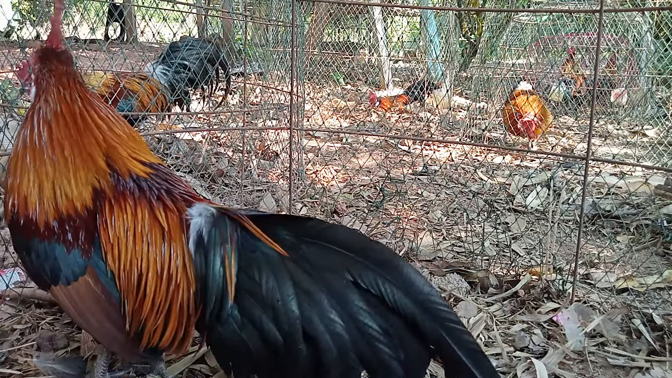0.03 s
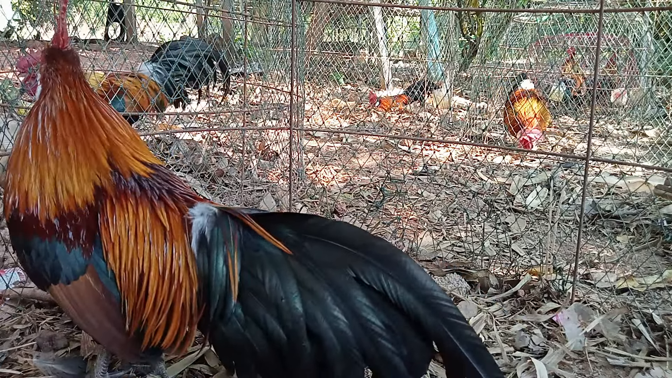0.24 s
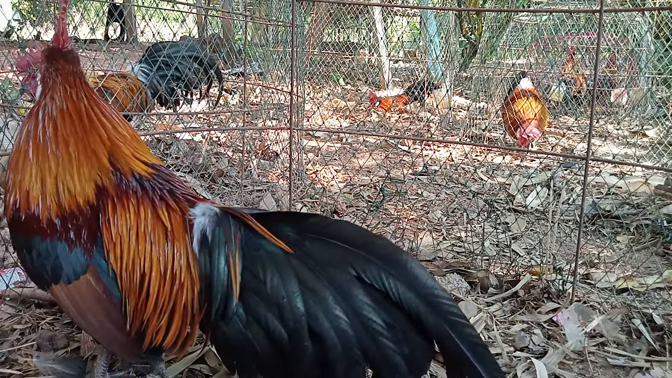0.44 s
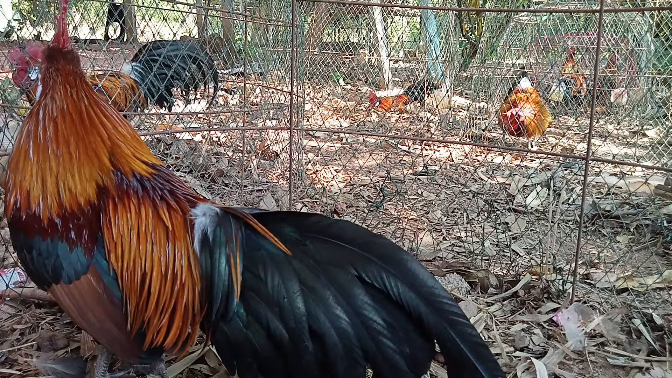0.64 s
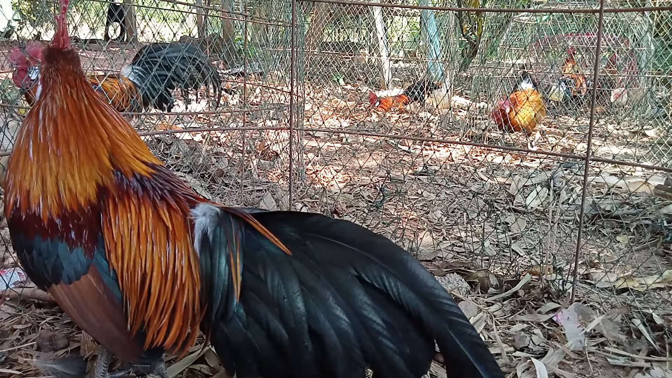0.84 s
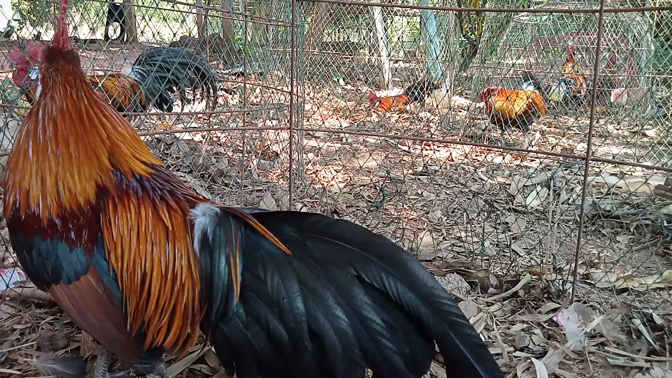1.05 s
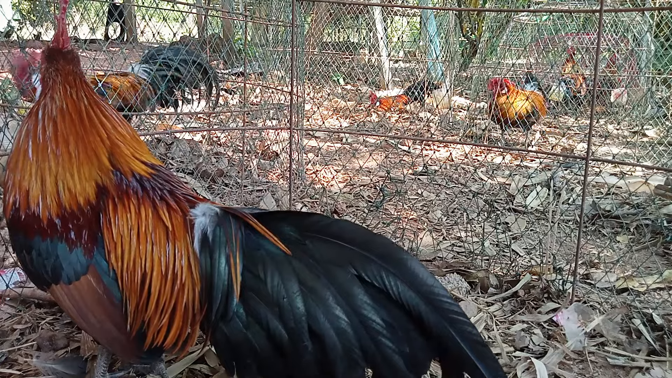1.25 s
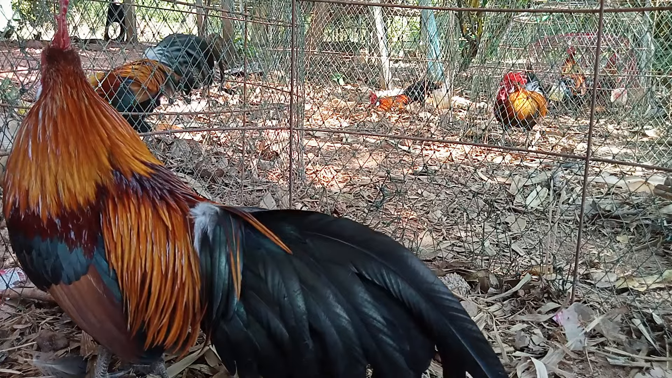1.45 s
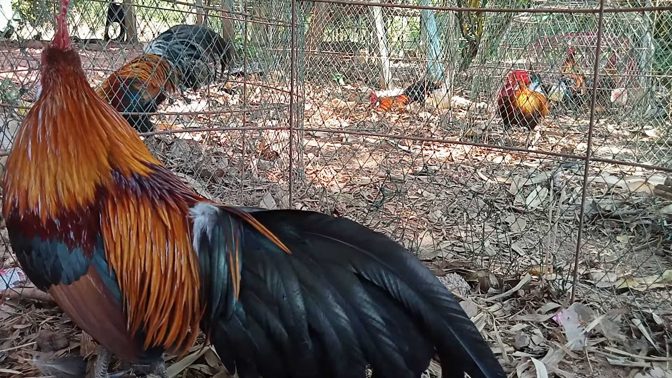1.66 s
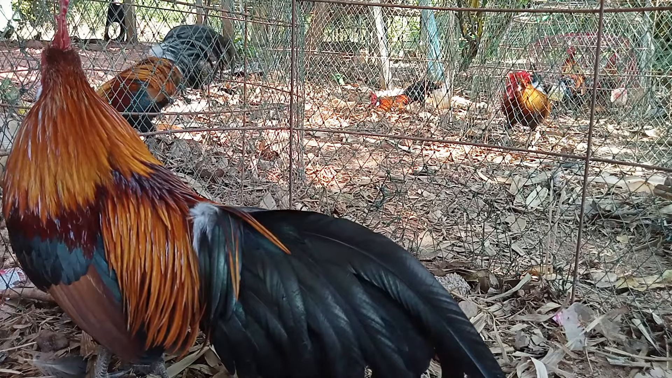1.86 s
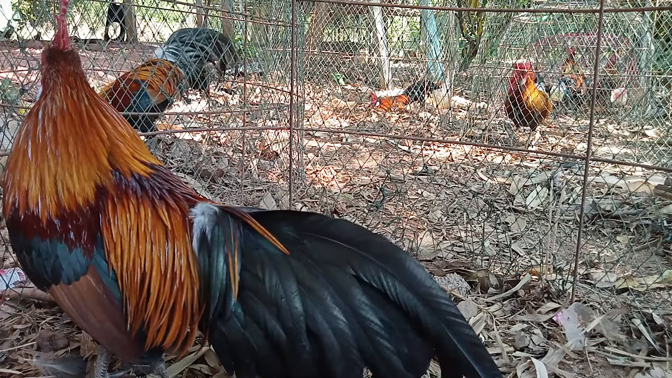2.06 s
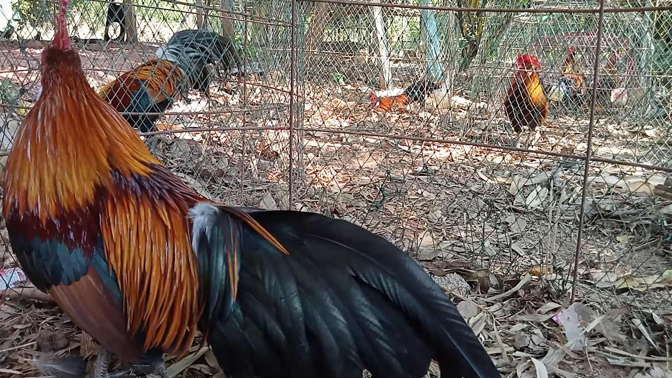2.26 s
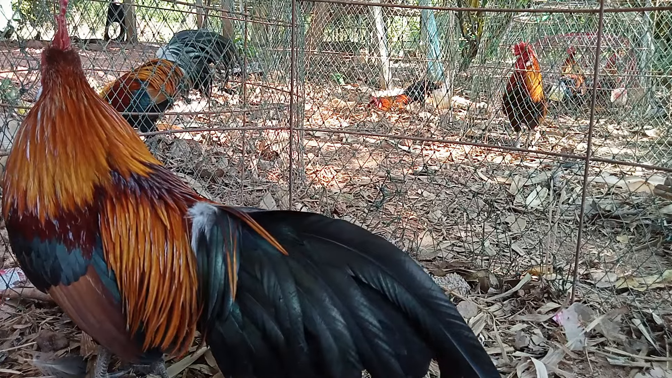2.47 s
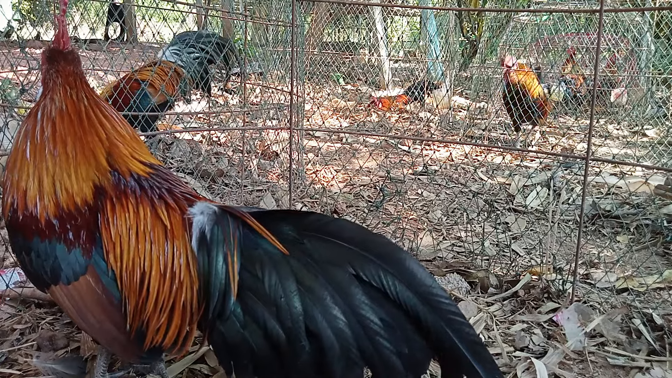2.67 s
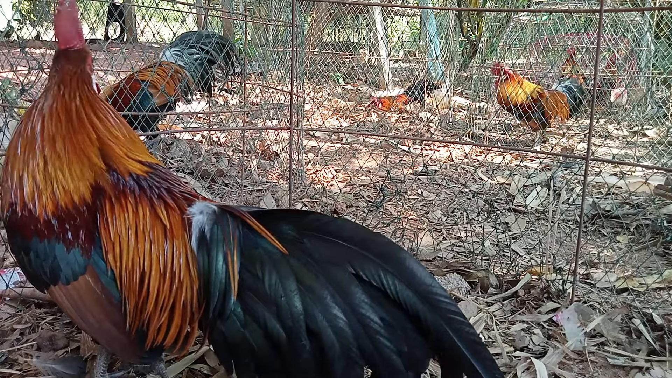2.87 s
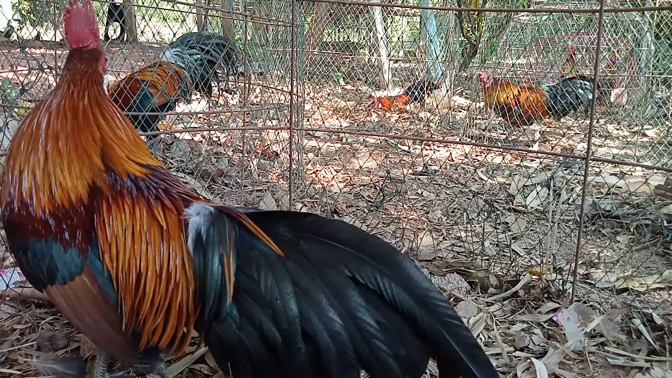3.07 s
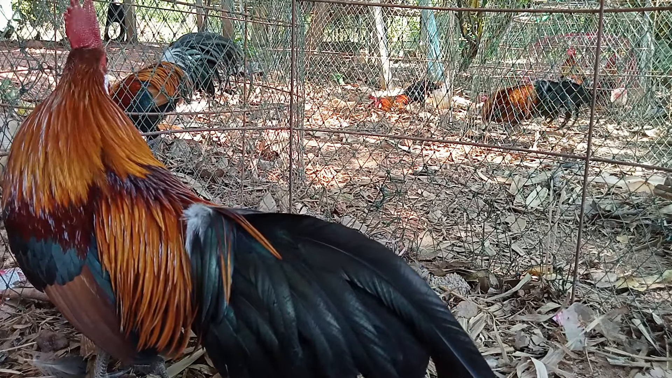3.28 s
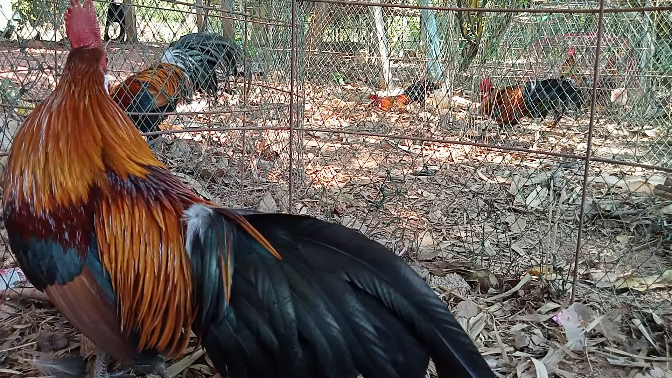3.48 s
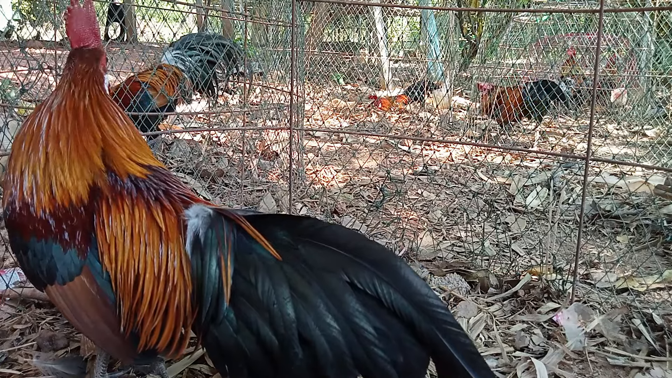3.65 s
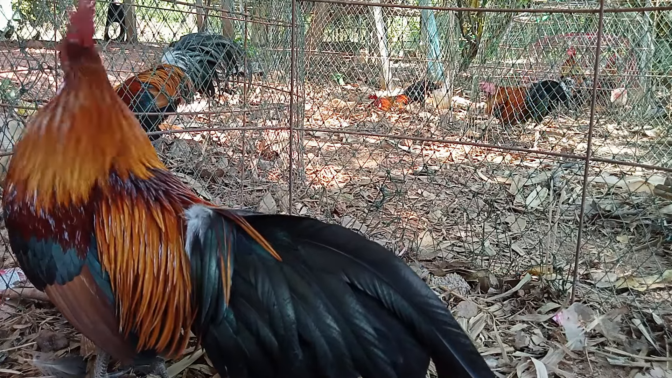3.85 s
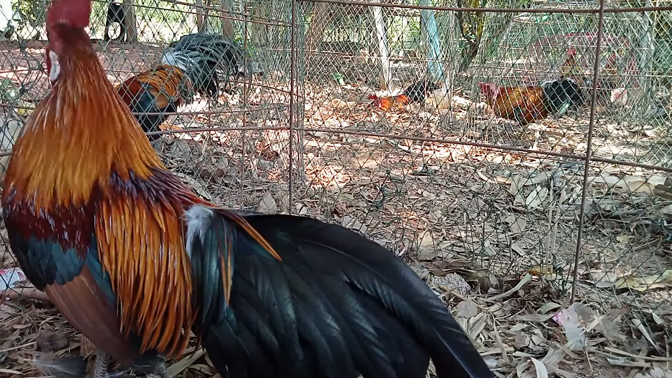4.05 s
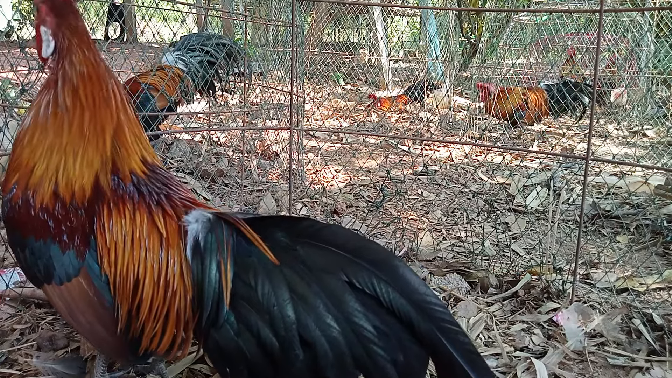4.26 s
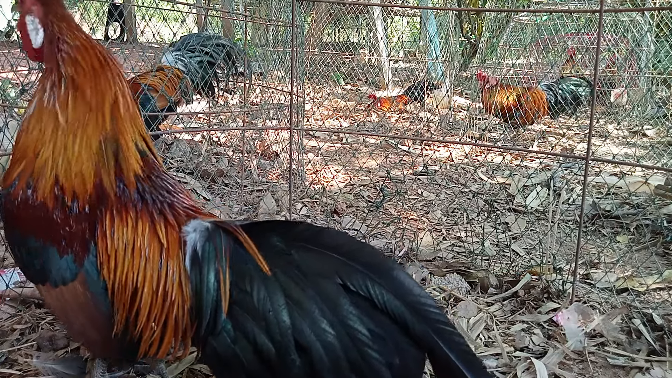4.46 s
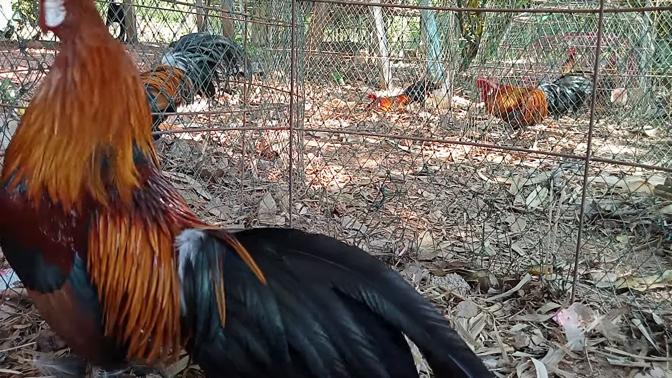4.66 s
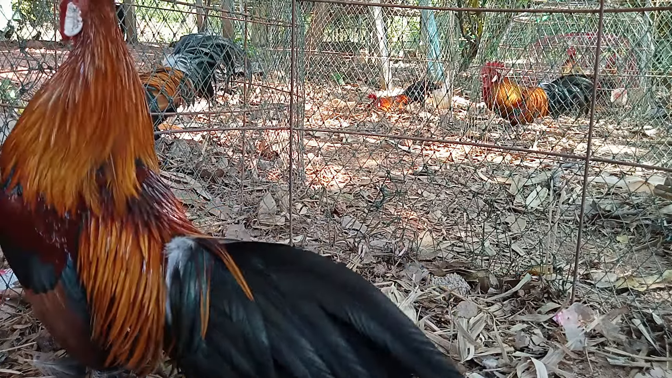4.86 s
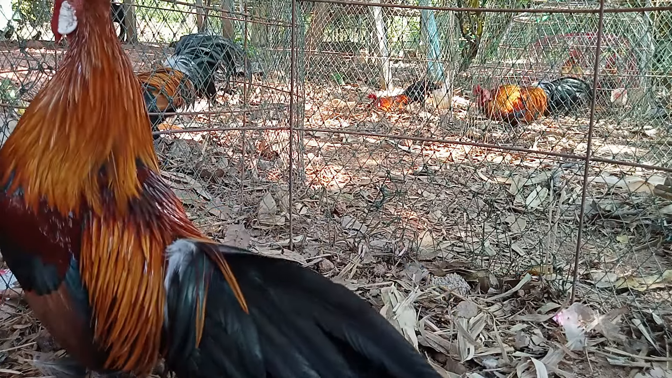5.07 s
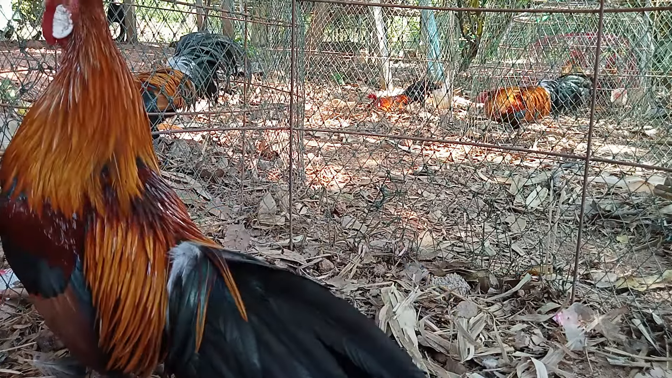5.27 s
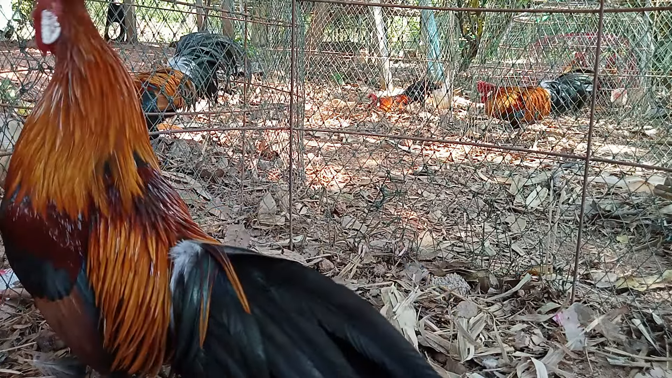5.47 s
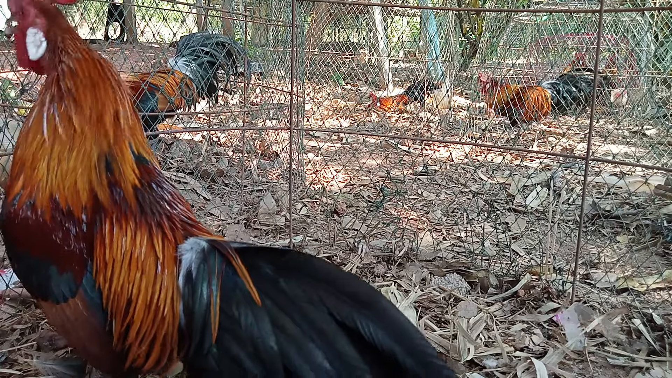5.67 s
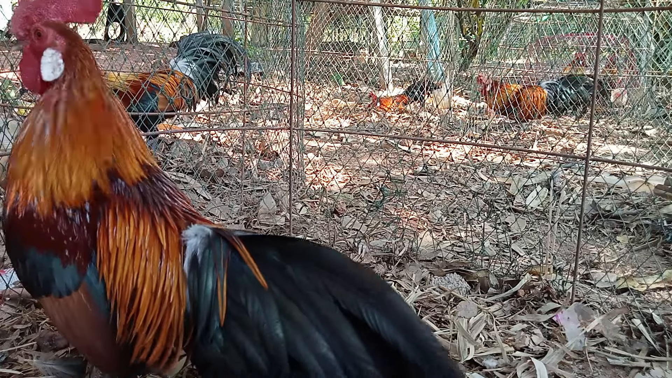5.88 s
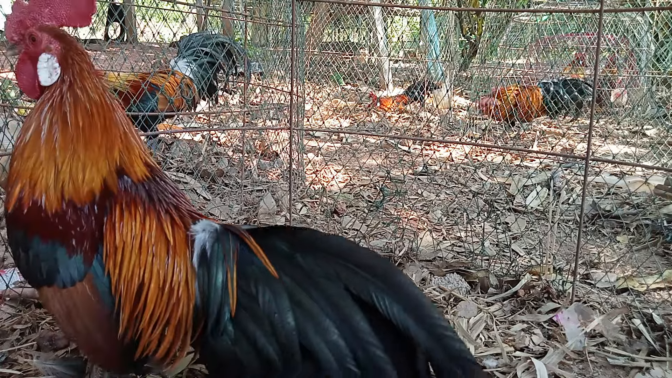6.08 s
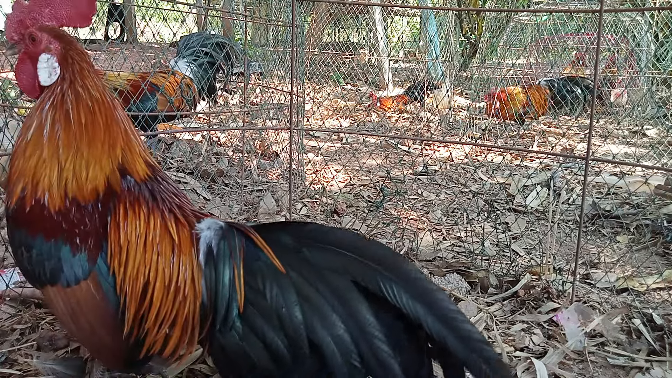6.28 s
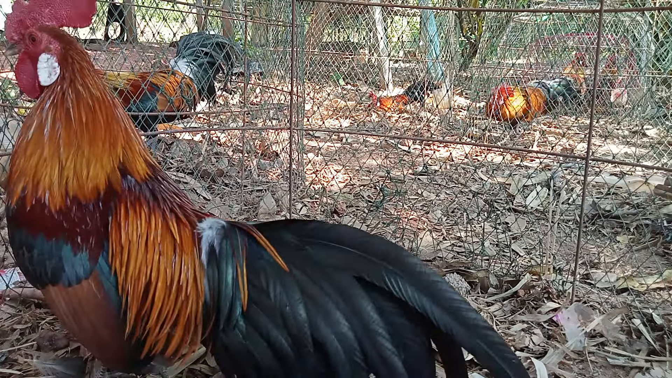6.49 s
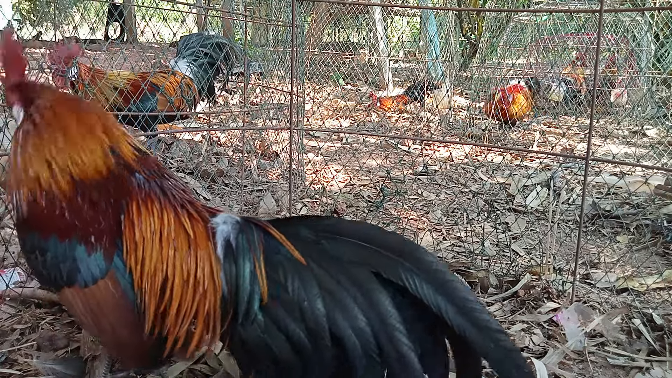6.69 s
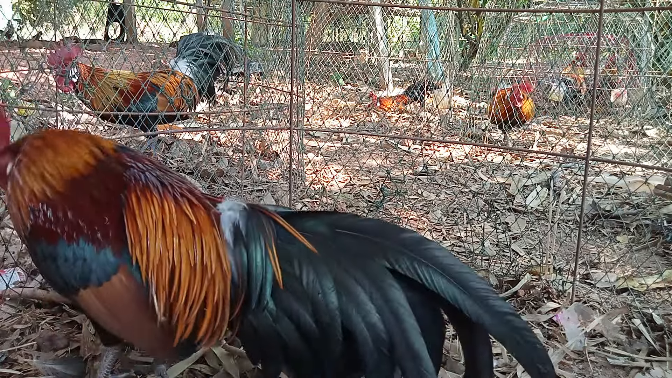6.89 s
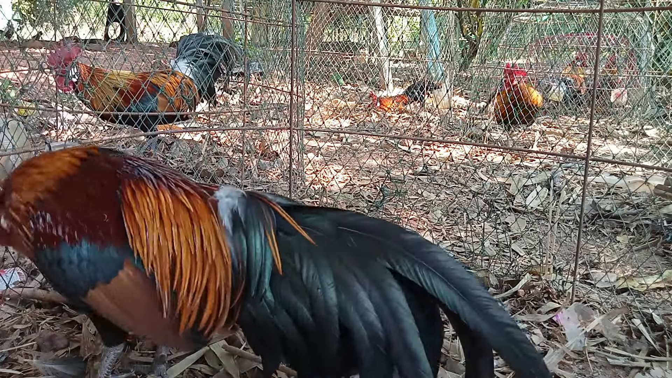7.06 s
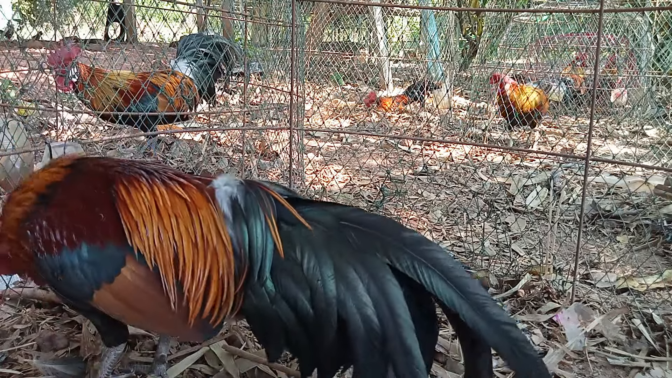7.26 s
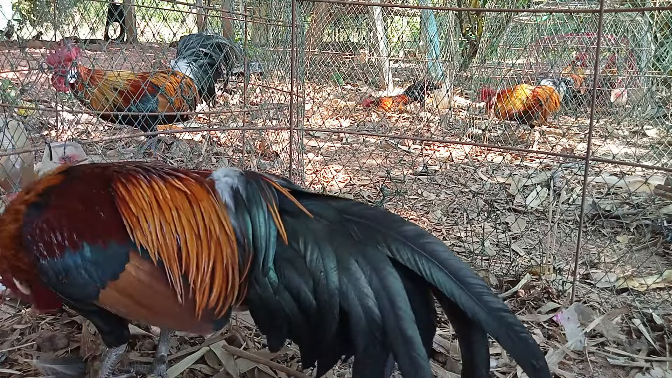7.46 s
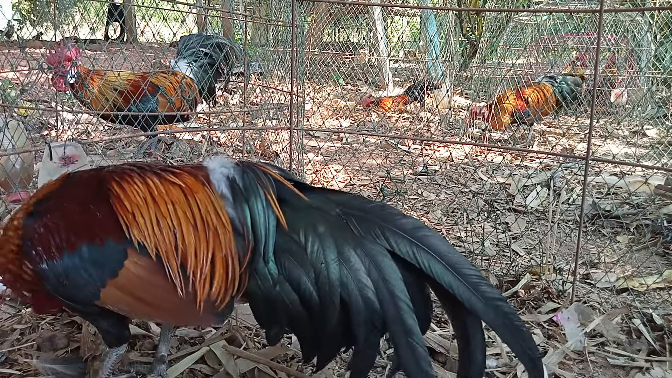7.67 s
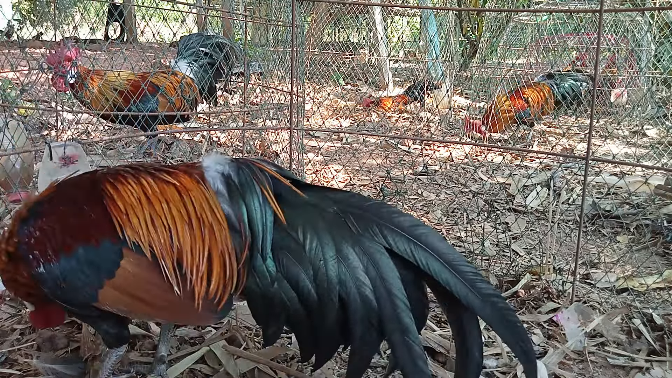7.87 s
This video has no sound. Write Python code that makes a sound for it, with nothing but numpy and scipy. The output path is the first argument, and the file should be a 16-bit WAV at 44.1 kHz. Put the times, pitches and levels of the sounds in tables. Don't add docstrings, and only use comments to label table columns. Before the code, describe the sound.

A leafy pen by a wood, heard through a phone microphone, with steady cicada hiss near 7 kHz and soft distant air. From 0 to 0.8 s a far-off rooster gives a hoarse, blurred crow in short syllables. Small birds drop and rise in thin whistles, feet crackle in dry litter, and scattered clucks sound. A faint low hen moan comes at 1.6-2.1 s, then a steady run of soft low clucks from 2.3 to 4.4 s. At 4.4 s a rooster crows very loudly and close, in short rising syllables, then a long, rough, wavering note from about 4.9 s, weakening until 5.75 s with echo in the trees; the background dips. Wind thumps around 5.8-6.3 s. A low rattling growl runs 5.9-6.9 s, slowing. Clucks and dry pecks return from 6.9 s, with a bird whistle at 7.25 s and a distant hoarse squawk climbing from 7.6 s to the end.

```python
import sys
import numpy as np
from scipy import signal
from scipy.fft import rfft, irfft
from scipy.io import wavfile
from scipy.ndimage import uniform_filter1d, minimum_filter1d

SR = 44100
rng = np.random.default_rng(int(sys.argv[2]) if len(sys.argv) > 2 else 0)


def digitize_waveform(pressure):
    field = np.atleast_2d(pressure).T
    bounded = np.clip(field, -1, 1)
    quanta = np.round(bounded * 32767).astype(np.int16)
    wavfile.write(sys.argv[1], SR, quanta)


def invert_db(x):
    u = np.asarray(x, float) / 20
    return 10 ** u


N = 349713
T = np.arange(N) / SR


def read(table):
    s, *columns = np.transpose(table)
    place = slice(int(s[0] * SR), min(int(s[-1] * SR), N))
    return place, [np.interp(T[place], s, column) for column in columns]


def edges(count, fade_s):
    i = np.arange(count) / (fade_s * SR)
    return np.clip(np.minimum(i, i[::-1]), 0, 1)


def swells(table, soft_s):
    gain = 0
    for start_s, length_s, level_db in table:
        inside_s = np.minimum(T - start_s, start_s + length_s - T)
        gain = gain + invert_db(level_db) * np.clip(inside_s / soft_s + .5, 0, 1) ** 2
    return gain


def unit(x):
    return x / np.sqrt(np.mean(x ** 2))


def even(x, over_s):
    return x / np.sqrt(uniform_filter1d(x ** 2, int(over_s * SR)) + 1e-12)


def ring(x, hz, width_hz, order=2):
    band = [hz - width_hz / 2, hz + width_hz / 2]
    return signal.sosfilt(signal.butter(order, band, "band", fs=SR, output="sos"), x)


def glide(x, hz, width_hz):
    turn = np.exp(2j * np.pi * np.cumsum(hz) / SR)
    low_pass = signal.butter(4, width_hz / 2, fs=SR, output="sos")
    return (signal.sosfilt(low_pass, x / turn) * turn).real


def walk(count, rate):
    low_pass = signal.butter(2, rate, fs=SR, output="sos")
    settle = SR // 2
    return unit(signal.sosfilt(low_pass, rng.standard_normal(count + settle))[settle:])


def colour(spectrum):
    hz, db = np.transpose(spectrum)
    f = np.fft.rfftfreq(N, 1 / SR)[1:]
    gain = np.append(0, invert_db(np.interp(np.log(f), np.log(hz), db)))
    return unit(irfft(rfft(rng.standard_normal(N)) * gain, N))


def echo(x, t60, build_s):
    t = np.arange(int(t60 * SR)) / SR
    tail = rng.standard_normal(SR * 2)[:len(t)] * invert_db(-60 * t / t60) * np.clip(t / build_s, 0, 1)
    return signal.fftconvolve(x, tail / np.sqrt(np.sum(tail ** 2)))[:len(x)]


def membrane(hz, rasp, count, spread=0):
    quick = 0.338 * np.mean(hz)
    steady = 2 * np.pi * np.cumsum(hz * (1 + .3 * rasp ** 2 * walk(len(hz), quick))) / SR
    flutter = .9 * np.cos(steady / 3 + 1.5 * walk(len(hz), quick / 8))
    phase = steady + rasp * (.6 * walk(len(hz), quick) + flutter)
    size = 1 + rasp * (.7 * walk(len(hz), quick) + flutter)
    return size * sum(np.cos(k * phase + spread * k * k) for k in range(1, count + 1))


def murmur(table, rasp, hz, width_hz, count, fade_s, air=.5):
    place, (pitch_hz, level_db) = read(table)
    out = np.zeros(N)
    pulses = unit(membrane(pitch_hz, rasp, count))
    breath = np.sqrt(SR / (2 * count * pitch_hz)) * rng.standard_normal(len(level_db))
    voice = even(ring(pulses + air * breath, hz, width_hz), 0.095)
    out[place] = voice * invert_db(level_db) * edges(len(level_db), fade_s)
    return out


def whistles(tables):
    out = np.zeros(N)
    for table in tables:
        place, (hz, db) = read(table)
        hz = uniform_filter1d(hz, SR // 60, mode="nearest")
        waver = invert_db(2.6 * walk(len(hz), 71))
        tone = np.sqrt(2) * np.sin(2 * np.pi * np.cumsum(hz) / SR)
        out[place] += tone * invert_db(db) * waver * edges(len(hz), 0.0034)
    return out


# frequency_hz, density_db (per Hz)
WIND_COLOUR = [(24, -25), (40, -0.5), (70, 8.5), (110, 7), (160, 0.5), (275, -12), (400, -22.5),
               (880, -120)]
# start_s, length_s, level_db
GUSTS = [(.11, 0.081, -46), (.6, 0.34, -48), (.9, 0.066, -26), (1.08, 0.14, -47.5), (1.39, .12, -37),
         (1.55, 0.39, -64), (2.14, 0.31, -52.5), (2.8, 0.12, -47), (3.04, 0.1, -48), (4.23, 0.094, -48.5),
         (4.82, 0.37, -59), (5.1, 0.39, -46.5), (5.5, 0.42, -53.5), (5.79, 0.089, -27), (5.9, 0.17, -34),
         (6.1, 0.064, -21), (6.18, 0.31, -39.5), (6.55, 0.24, -36), (6.82, 0.15, -42), (6.95, 0.23, -39),
         (7.2, 0.7, -50.5)]


def wind():
    calm_db = -68.5
    flicker = unit(invert_db(5.8 * walk(N, 20.0)))
    out = colour(WIND_COLOUR) * flicker * (invert_db(calm_db) + swells(GUSTS, 0.094))
    return signal.sosfilt(signal.butter(3, 48, "high", fs=SR, output="sos"), out)


# frequency_hz, density_db (per Hz)
WOOD = [(35, -41), (60, -12), (335, 1), (443, -2.5), (509, 5), (613, -2), (705, 3.5), (953, 3.5),
        (1960, -4.5), (2530, -1.5), (5580, 1), (7030, 8.5), (8670, -7), (9970, -13), (15500, -6)]


def wood():
    swell = invert_db(.8 * walk(N, 2))
    throb = invert_db(1.5 * walk(N, 3) + 1.5 * walk(N, 90))
    cicadas = unit(ring(rng.standard_normal(N), 7170, 850)) * invert_db(-54.0) * throb
    return colour(WOOD) * invert_db(-49.5) * swell + cicadas


# start_s, length_s, level_db
LEAVES = [(.11, 0.055, -51), (0, 3.54, -58), (1.54, 0.021, -48), (6.9, 0.9, -70), (0, 0.38, -69),
          (1.05, 0.15, -55.5), (1.32, 0.25, -55.5), (2.5, 0.486, -60.5), (4.02, 0.29, -51.5),
          (5.96, 0.19, -45.5), (6.71, 0.31, -54)]


def leaves():
    crackle_db = 1.35 * rng.exponential(size=N // 8 + 1).repeat(8)[:N]
    grains = rng.standard_normal(N) * invert_db(crackle_db + 4.9 * walk(N, 8.9))
    body = unit(ring(grains, 4460, 8200, order=1))
    crisp = invert_db(-5.5) * unit(ring(grains, 15100, 4800))
    return (body + crisp) * swells(LEAVES, 0.019)


# start_s, length_s, level_db
FAR_CROWS = [
    (0, 0.057, -63.5),
    (0.047, 0.14, -53.5),
    (0.206, 0.15, -54.5),
    (0.362, 0.12, -52.5),
    (0.497, 0.172, -54.5),
    (0.658, 0.11, -60.5),
]
FAR_HZ = (1632, 1804)


def far_crows():
    out = np.zeros(N)
    for s, long, db in FAR_CROWS:
        arch = [(s, .97, -5), (s + 0.38 * long, 1.01, 0), (s + long, .98, -17)]
        place, (bend, shape_db) = read(arch)
        pulses = 0
        for hz in FAR_HZ:
            pulses = pulses + membrane(hz / 2 * bend * (1 + .02 * walk(len(bend), 30)), .42, count=4)
        voice = even(ring(pulses, 1820, 560), 0.14)
        for hz, width_hz, weak_db in ((1000, 250, -18.5), (2250, 380, -30), (3350, 230, -18)):
            voice = voice + invert_db(weak_db) * unit(ring(pulses, hz, width_hz))
        out[place] += voice * invert_db(db + shape_db) * edges(len(bend), 0.003)
    return invert_db(9.0) * out + invert_db(15.5) * echo(out, 0.12, 0.0024)


# start_s, peak_db, pitch_hz, length_s, slant (pitch, as share)
RUN = [(2.35, -32.5, 335, 0.047, 0.19), (2.398, -40, 400, 0.05, 0.13), (2.474, -30.5, 326, .045, 0.21),
       (2.548, -29.5, 298.7, 0.056, -0.19), (2.582, -27.5, 331.5, 0.041, 0.19),
       (2.701, -28.5, 310.6, 0.066, -0.17), (2.765, -30, 273, 0.065, 0.035),
       (2.863, -28.5, 314, 0.053, 0.21), (2.987, -26.5, 369, 0.056, 0.14), (3.119, -28, 424, .055, 0.014),
       (3.238, -32, 404, 0.06, -0.024), (3.333, -28.5, 424, 0.057, -0.22), (3.443, -26.5, 410, 0.063, 0.01),
       (3.583, -26.5, 341.7, 0.058, -0.16), (3.707, -31, 337, 0.049, -.1), (3.872, -40, 387, 0.042, -0.062),
       (4.007, -25.5, 333.6, 0.054, -0.18), (4.055, -34, 334, 0.04, 0.076), (4.136, -28.5, 323.6, 0.052, 0),
       (4.256, -27.5, 404, 0.044, 0), (4.401, -30, 382, .05, 0.004)]
# start_s, peak_db
STRAYS = [(0.116, -33.5), (0.237, -42.5), (0.708, -37.5), (0.828, -46), (0.941, -43), (1.11, -31.5),
          (1.215, -44.5), (1.315, -43), (1.4, -42.5), (1.481, -39.5), (1.598, -37.5), (2.235, -41.5),
          (6.874, -37), (6.957, -37), (7.046, -32.5), (7.146, -32.5), (7.219, -38.5), (7.309, -43.5),
          (7.414, -32), (7.475, -35), (7.56, -41), (7.596, -42), (7.73, -27.5), (7.906, -38)]
# time_s, rasp (0-1)
HOARSE = [(2.25, .6), (2.3, .22), (2.8, .22), (3.0, .45), (4.3, .55), (6.8, .25), (7.5, .55)]


def clucks():
    out = np.zeros(N + SR)
    for s, db, *own in RUN + STRAYS:
        chance = rng.uniform(-0.973, 1, size=3)
        usual = 338.6 * (1 + 0.1484 * chance[0]), 0.054, 0.16 * chance[1]
        pitch_hz, length_s, slant = own or usual
        u = (np.arange(SR // 8) / SR / length_s).clip(0, 1)
        puff = np.sin(np.pi * u ** (0.83 + 0.18 * chance[0])) ** 1.67
        hz = pitch_hz * (.91 + .6 * u * (1 - u) + 1.4 * slant * (u - .5))
        rasp = np.interp(s, *np.transpose(HOARSE)) + .08 * chance[1]
        pulses = membrane(hz, rasp, count=5)
        low = unit(ring(pulses, 540, 460, order=3))
        bright = invert_db(-12 + 3 * chance[2]) * unit(ring(pulses, 950, 380, order=4))
        i = int((s - .012) * SR)
        out[i:i + len(u)] += invert_db(db - 6.5) * (low + bright) * puff
    return out[:N]


# share_of_length, share_of_drop_left, level_db
FALL = [(0, .97, -5), (.14, 1, 0), (.42, .7, -1), (.66, .54, -2), (.88, .1, -2), (1, 0, -5)]
# start_s, length_s, top_hz, end_hz, level_db
FALLS = [(0.233, 0.14, 5270, 2450, -51.5), (0.505, 0.17, 5210, 2180, -49), (.7, 0.084, 4600, 3060, -56.5),
         (0.838, 0.043, 3650, 3420, -54), (0.854, .16, 5640, 1980, -45), (0.962, 0.05, 4970, 2900, -51),
         (1.25, 0.15, 5470, 2044, -48), (1.61, 0.14, 5520, 3180, -57), (1.697, 0.16, 4960, 2310, -46),
         (2.089, 0.12, 5100, 3080, -44), (2.13, 0.04, 3660, 3280, -53), (2.294, 0.1, 4770, 3270, -56),
         (2.337, 0.13, 5650, 2060, -44), (2.494, 0.11, 4020, 3630, -61), (2.77, .1, 3910, 3150, -55.5),
         (2.958, 0.11, 4560, 3040, -55), (3.281, 0.088, 5100, 3040, -49.5),
         (3.393, 0.11, 3890, 3430, -55.5), (3.525, 0.079, 5400, 3080, -47.5), (3.49, 0.16, 1500, 1480, -61),
         (4.182, 0.036, 4300, 3150, -55), (6.38, 0.1, 3970, 2798, -58), (7.738, 0.093, 4830, 2730, -57)]
# time_s, pitch_hz, level_db
RISE = [(0, 3450, -23.5), (.05, 4150, -14.5), (.1, 4600, -7), (.145, 4980, -8.5), (.17, 5020, -28)]
# start_s, level_db
RISES = [
    (0.267, -31.5),
    (1.33, -33),
    (2.632, -33.5),
    (6.024, -33.5),
    (7.254, -34.5),
]


def birds():
    rises = whistles([[(s + u, hz, db + d) for u, hz, d in RISE] for s, db in RISES])
    falls = whistles([[(s + u * long, end + left * (top - end), db + d) for u, left, d in FALL]
                      for s, long, top, end, db in FALLS])
    return rises + falls + invert_db(-3.5) * echo(rises, 0.29, 0.0053) + invert_db(-6.0) * echo(falls, 0.17, 0.028)


# time_s, pitch_hz, level_db
MOAN = [
    (1.62, 213, -54),
    (2.108, 198, -53.5),
    (2.14, 204, -68),
]


def moan():
    return murmur(MOAN, .13, 620, 720, count=6, fade_s=.05, air=.3)


# time_s, level_db
PECKS = [(2.57, -45), (3.877, -48), (6.966, -47.5), (7.119, -72), (7.144, -42), (7.56, -49.5),
         (7.75, -48.5)]


def pecks():
    out = np.zeros(N)
    for s, db in PECKS:
        out += invert_db(db) * np.exp(-.5 * ((T - s - .006) / 0.011) ** 2)
    return out * unit(ring(rng.standard_normal(N), 1740, 3400))


# time_s, pitch_hz, level_db, gape (of the beak, 0-1), stretch (of the neck, 0-1)
CROW_ONE = [(4.4, 778, -56, 0.85, 0.9), (4.408, 751, -12, 0.64, 0.52), (4.435, 802.5, -8.5, 0.98, 0.31),
            (4.465, 818, -13.5, 1, 0.1), (4.473, 909.6, -14.5, 0.74, 0.4), (4.51, 900, -14.5, 0.96, 0.3),
            (4.545, 843.3, -19.5, 0.76, 0.57), (4.562, 845, -33, 0.8, 0.1)]
CROW_TWO = [(4.562, 850, -37, 0.76, .3), (4.57, 873.3, -20, .85, .6), (4.58, 932.4, -15, 0.45, 0.48),
            (4.627, 1068, -13.5, 0.69, 0.15), (4.705, 935.7, -11.5, 0.56, 0.56),
            (4.718, 1010, -9, 0.74, 0.86), (4.735, 982, -14, 0.53, 0.81), (4.753, 1131, -10, 0.78, 0.33),
            (4.79, 958, -15, 0.46, 0.94), (4.818, 950.4, -30.5, 0.77, 1)]
CROW_RISE = [(4.82, 979, -42, 1, 0.68), (4.837, 990, -17.5, 0.2, 0.53), (4.852, 1093, -8.5, 0.12, 0.55),
             (4.882, 1127, -9.5, 0.39, 0.78), (4.887, 1271, -9, 0.33, 0.51),
             (4.904, 1242, -10.5, 0.28, 0.74), (4.915, 1214, -12.5, 0.73, 0.22),
             (4.921, 978, -4, 0.054, 0.67)]
CROW_LONG = [(4.934, 993.6, -7.5, 0.39, 0.61), (4.97, 994, -13.5, 0.69, 0.82), (4.999, 979, -14, 0.6, 0.84),
             (5.061, 975, -14, 0.6, 0.91), (5.152, 967, -9.5, 0.49, 0.67), (5.164, 992, -10.5, 0.49, 0.72),
             (5.24, 952, -12, 0.36, 0.61), (5.302, 948, -10, 0.16, 0.56), (5.399, 934, -15.5, 0.33, 0.55)]
CROW_FADE = [(5.417, 882, -23.5, 0.83, 0.67), (5.461, 938, -16.5, 0.81, 0.28),
             (5.484, 936.6, -21.5, 0.97, 0.29), (5.5, 917, -17.5, .87, 0.22), (5.52, 928, -24, 0.85, 0.17),
             (5.536, 939, -19.5, 0.82, 0.11), (5.56, 914, -21.5, .86, 0.18),
             (5.578, 920, -15.5, 0.78, 0.31), (5.597, 922, -37, 0.55, 0.073)]
CROW_END = [(5.601, 888.6, -33.5, 0.61, 0.48), (5.636, 1045, -22, 0.58, 0.41),
            (5.665, 1065, -21.5, 0.6, 0.42), (5.701, 1021, -18, 0.76, 0.32), (5.739, 899, -23, 0.23, 0.056),
            (5.755, 828, -25, 0.22, 0.031)]
SYLLABLES = CROW_ONE + CROW_TWO + CROW_RISE + CROW_LONG + CROW_FADE + CROW_END
# start_s, rasp (0-1)
RASP = [(4.4, .2), (4.415, .04), (4.467, .46), (4.562, .6), (4.58, .28), (4.648, .5), (4.712, .04),
        (4.795, .43), (4.842, .015), (4.887, .25), (4.922, .05), (4.975, .17), (5.045, .26), (5.24, .16),
        (5.4, .6), (5.455, .25), (5.54, .02), (5.612, .45), (5.642, .015)]
# catch_s, dip_db
SLIPS = [(4.9948, 9.5), (5.029, 9), (5.0533, 2.5), (5.0959, 9), (5.122, 17), (5.1575, 4.5), (5.1907, 6.5),
         (5.2201, 5), (5.258, 13.5), (5.2901, 15), (5.322, 20), (5.356, 24.5), (5.3867, 25.5)]
# time_s, pitch_hz, low_share (of the first resonance, 0-1), high_share (of the upper ones, 0-1)
TWIN = [(4.915, 1205, 0.17, 0.15), (4.928, 1121, 0.95, 0.32), (4.946, 1080, 0.66, 0.36),
        (4.954, 1098, .1, 0.36), (5.03, 1106, .15, 0.44), (5.06, 1106, 0.22, .45), (5.15, 1107, 0.43, 0.34),
        (5.164, 1115, 0.59, 0.7), (5.209, 1146, 1, 1), (5.251, 1117, 0.76, 0.91), (5.341, 1079, 1, 0.88),
        (5.399, 1078, 1, 0.92), (5.412, 1073, 0, 0.067)]
# time_s, treble_db (under the voice)
FACING = [(4.4, -25.5), (4.53, -25), (4.57, -41), (4.63, -35), (4.7, -33.5), (4.78, -19), (4.84, -44),
          (4.9, -29.5), (5.0, -29), (5.22, -35.5), (5.36, -41.5), (5.46, -24), (5.56, -25), (5.6, -35),
          (5.65, -19.5), (5.68, -38), (5.76, -33)]
THROAT = [1030, 1520, 990]


def crow_slips(t):
    slipping, dip = 0, 0
    for catch_s, dip_db in SLIPS:
        late_s = t - catch_s + 0.006
        width_s = np.where(late_s < 0, 0.004 + 0.00022 * dip_db, .0025)
        shape = np.exp(-.5 * (late_s / width_s) ** 2)
        slipping = slipping + shape
        dip = dip + dip_db * shape
    return slipping, dip


def crow_sources(t, hz, slipping, twin_hz, low_share, high_share):
    since, amount = np.transpose(RASP)
    latest = np.searchsorted(since, t, "right").clip(1) - 1
    rasp = uniform_filter1d(amount[latest], int(.008 * SR))
    hz = hz * (1 + 0.00743 * walk(len(t), 64))
    steady = np.minimum(rasp, .02 + 1.7 * rasp ** 2) + .2 * slipping
    air = 16 * (rasp - .2).clip(0) * rng.standard_normal(len(t))
    rasp = rasp + 0.4604 * slipping

    def pulses(rough, share):
        own, other = (ring(membrane(f, rough, count=20, spread=1 / 3), 9060, 17120, order=3)
                      for f in (hz, twin_hz))
        return [own + s.clip(0, 1) * (other - own) for s in share]

    first, source = pulses(rasp, (low_share, np.minimum(low_share, high_share)))
    upper, = pulses(steady, (high_share,))
    return hz, rasp, first + air, source, upper


def crow():
    place, (hz, db, gape, stretch) = read(SYLLABLES)
    t, out = T[place], np.zeros(N)
    slipping, dip_db = crow_slips(t)
    hz = uniform_filter1d(hz, SR // 120, mode="nearest")
    when, *twin = np.transpose(TWIN)
    twin_hz, low_share, high_share = (np.interp(t, when, column) for column in twin)
    hz, rasp, first, source, upper = crow_sources(t, hz, slipping, twin_hz, low_share, high_share)

    open_share = gape.clip(0, 1)
    second = invert_db(-12.5 + open_share * (13.5 + 12.5))
    beak = invert_db(-35.5 + open_share * (15.5 + 35.5))
    whole = np.sqrt(1 + second ** 2 + beak ** 2)
    third = whole * invert_db(-31.5 + stretch * (-1.5 + 31.5))
    slow_hz = uniform_filter1d(hz + high_share * (twin_hz - hz), SR // 40, mode="nearest")
    through = sum(np.interp(t, [part[0][0], part[-1][0]], [0, 1], 0, 0)
                  for part in (CROW_ONE, CROW_TWO, CROW_RISE + CROW_LONG))
    centres = 1.923 * slow_hz, 3.67 * slow_hz + 646 * stretch, 7077 - 694 * through

    voice = even(ring(first, 1155, 684, order=4), 0.036) * invert_db(-dip_db)
    resonances = zip(centres, THROAT, (second, third, beak), (source, upper, upper))
    for centre_hz, width_hz, gain, pulses in resonances:
        voice = voice + even(glide(pulses, centre_hz, width_hz), 0.022) * gain * invert_db(-.6 * dip_db)
    roused = rasp.clip(0, .3)
    voice = voice + even(ring(source, 2602, 250), 0.02) * second * 1.8 * roused
    voice = voice + even(ring(source, 5900, 1100, order=3), .03) * third * 1.44 * roused * stretch

    facing_db = np.interp(t, *np.transpose(FACING))
    bands = sum(ring(upper, f, 2400, order=3) * invert_db(band_db + 2.7 * walk(len(t), 10))
                for f, band_db in ((11500, 1.5), (14500, 2.5)))
    top = even(bands, 0.03) * whole * invert_db(facing_db)
    haze = even(ring(source + .5 * upper, 8270, 1900, order=3), 0.037)
    haze = haze * np.hypot(third * invert_db(-12.5), beak * invert_db(-27.0)) * invert_db(0.35 * (facing_db + 29.5))
    effort = invert_db(0.2 * (db + 9.0))
    out[place] = (voice + top + haze * effort) / whole * invert_db(db) * edges(len(t), 0.0019)
    return out


# time_s, pitch_hz, level_db
UNDER = [(5.43, 742, -46), (5.46, 742, -44), (5.49, 721, -41.5), (5.53, 658, -43), (5.545, 661, -52)]


def undertone():
    return whistles([UNDER])


# time_s, pitch_hz, level_db
GROWL = [
    (5.93, 115.5, -46),
    (6.08, 104, -48.5),
    (6.2, 94, -43.5),
    (6.514, 75.76, -41),
    (6.92, 75.4, -41.5),
]


def growl():
    chest = murmur(GROWL, .18, 646, 744, count=16, fade_s=.04, air=.5) * invert_db(1.5 * walk(N, 8))
    edge = murmur(GROWL, .3, 3760, 1000, count=50, fade_s=0.048, air=0.5)
    return chest + invert_db(-15.5) * edge


# time_s, pitch_hz, level_db
SQUAWK = [
    (7.6, 804, -53),
    (7.75, 869, -50),
    (7.93, 956, -48),
]


def squawk():
    return murmur(SQUAWK, 0.44, 1700, 830, count=4, fade_s=0.0043, air=0.58)


def lagging_power(x, memory_s):
    keep = np.exp(-1 / (memory_s * SR))
    return signal.lfilter([1 - keep], [1, -keep], x ** 2)


def scene():
    near = crow() + undertone()
    hens = clucks() + moan() + growl() + pecks()
    yard = birds() + hens + invert_db(-9.5) * echo(hens, 0.18, 0.0044)
    yard = yard + far_crows() + squawk() + leaves() + wood()
    quick_duck = (1 + lagging_power(near, 0.15) / invert_db(-20) ** 2) ** -.3
    slow_duck = (1 + lagging_power(near, 0.6) / invert_db(-27.5) ** 2) ** -.12
    behind = yard + invert_db(-7) * echo(near, 0.57, 0.003)
    return (near + quick_duck * slow_duck * behind + wind())[None]


def band_limit(x):
    return signal.sosfilt(signal.butter(12, 16310, fs=SR, output="sos"), x)


def record(dry):
    ceiling = .86
    room_left = minimum_filter1d(ceiling / np.maximum(np.abs(dry), ceiling), SR // 100)
    held = dry * uniform_filter1d(room_left, SR // 100)
    held = signal.sosfilt(signal.ellip(10, .3, 80, 15550, fs=SR, output="sos"), held)
    return band_limit(held)


dry = scene()
out = record(dry)
digitize_waveform(out)
```